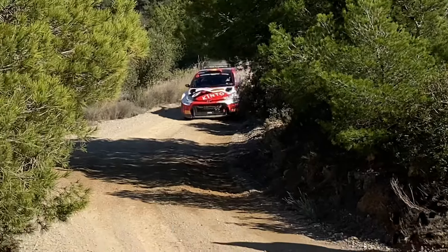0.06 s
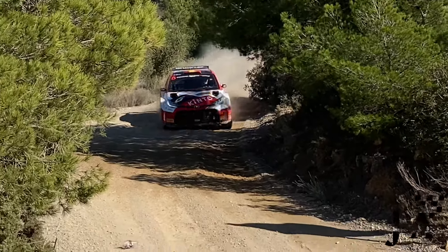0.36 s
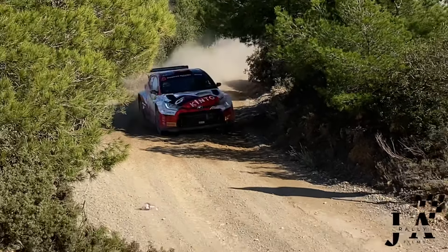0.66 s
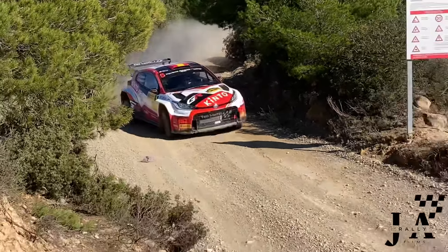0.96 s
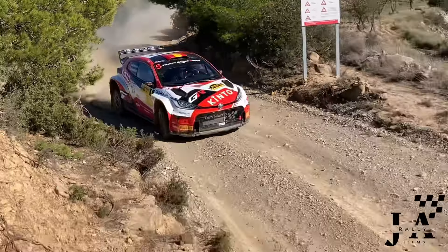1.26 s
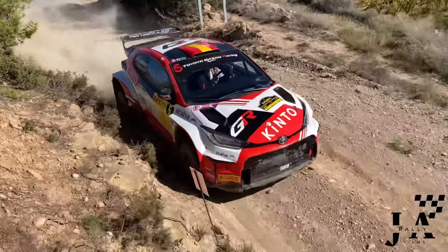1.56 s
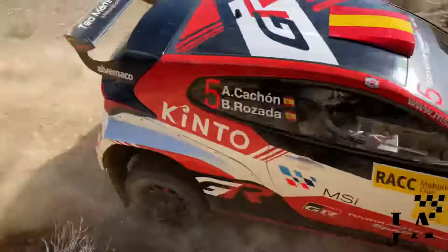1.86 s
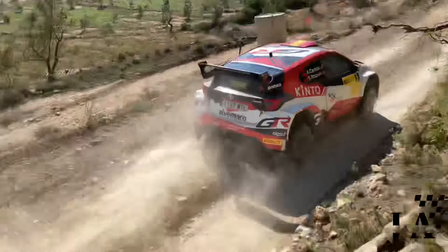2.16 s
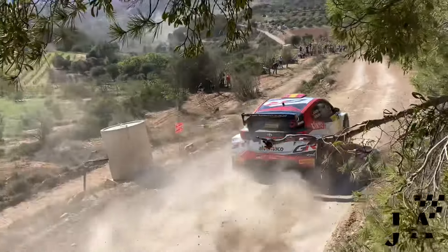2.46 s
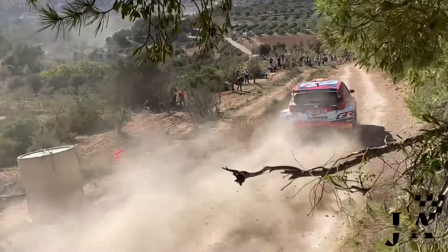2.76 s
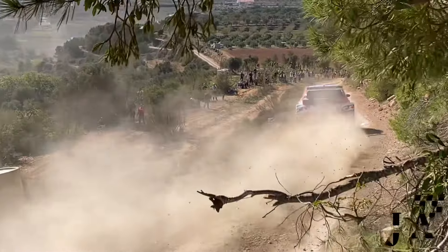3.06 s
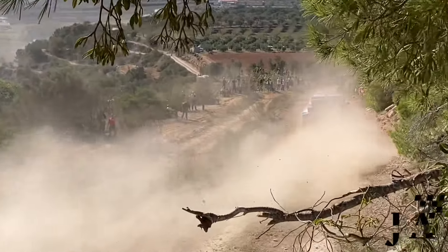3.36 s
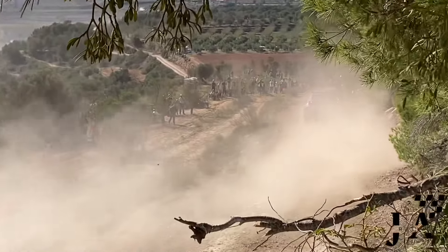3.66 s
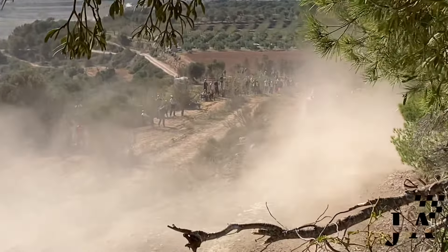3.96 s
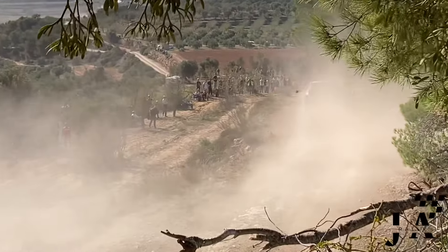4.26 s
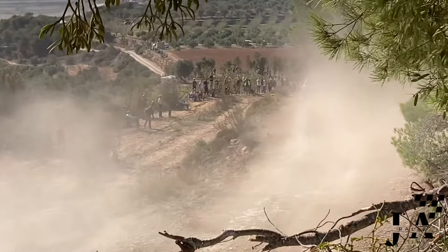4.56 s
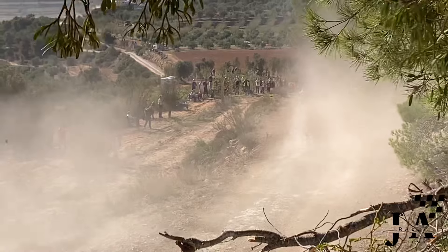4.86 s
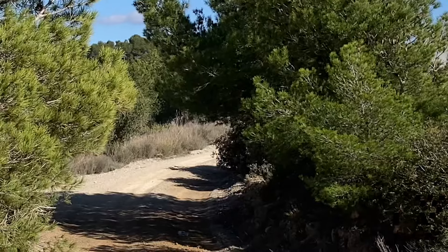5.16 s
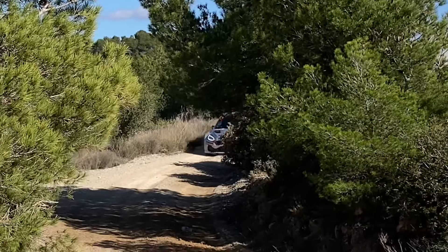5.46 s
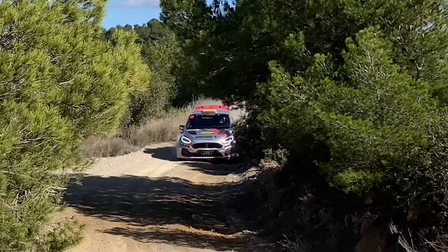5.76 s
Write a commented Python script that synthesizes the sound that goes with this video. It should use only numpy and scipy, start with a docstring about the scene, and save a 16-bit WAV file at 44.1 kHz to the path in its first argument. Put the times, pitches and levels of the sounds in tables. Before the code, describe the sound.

Heard from the verge of an outdoor gravel track, a turbocharged rally car approaches hard, pops off the throttle, then accelerates past very close with a rasping snarl. Tyres roar, pebbles scatter and air thumps the microphone. As it draws away, the engine note breaks into quick runs of bangs. The sound cuts with a click to another car coasting nearer, burbling and thudding over the ruts.

```python
"""A three-cylinder turbo rally car on a gravel road, from a stereo microphone on the verge, 4.5 m off.
It storms up, lifts, passes and pulls away, each firing ringing the exhaust, which pops off the throttle
and breaks into single bangs when the ignition is cut. The turbo whistles, tyres spray stones and air
buffets the microphone; distance, jolts and throttle set the road noise, and the banks answer dully.
Then a splice clicks as the sound cuts abruptly to a second car coming up, burbling off the throttle."""
import sys
import numpy as np
from scipy import signal
from scipy.fft import rfft, irfft, next_fast_len
from scipy.io import wavfile
from scipy.ndimage import uniform_filter1d, map_coordinates

SR = 44100
rng = np.random.default_rng(int(sys.argv[2]) if len(sys.argv) > 2 else 0)


def transcribe(signal):
    """Save signal, clipped to [-1, 1], as a 16-bit WAV file at the path in sys.argv[1]."""
    frames = np.atleast_2d(signal).T
    limited = np.clip(frames, -1, 1)
    pcm = np.round(limited * 32767).astype(np.int16)
    wavfile.write(sys.argv[1], SR, pcm)


N = 256220
T = np.arange(N) / SR
PASS_S, CLOSEST_M, SPEED_M_PER_S = 1.702, 4.47, 20.6  # the first car's path past the microphone
SECOND_CAR_S = 5.029

# engine speed, one table a pull: time_s, firing_hz
REVS = [
    [(.12, 142.3), (.23, 128.4), (.286, 137.9), (.346, 132), (.454, 140.5), (.49, 134.7), (.6, 142.5),
     (.71, 138), (.76, 144.3), (.83, 141.7), (.87, 132.9), (.93, 130.7), (1.02, 136)],
    [(1.27, 136), (1.446, 125.5), (1.526, 133), (1.572, 128.6), (1.682, 133.6), (1.76, 127.5),
     (1.964, 131.8), (1.994, 125.6), (2.044, 138.4), (2.09, 130.8), (2.118, 137.8), (2.156, 132),
     (2.33, 130.6), (2.78, 140.4), (3.03, 134.7), (3.08, 112.1), (3.3, 119.3), (3.6, 106.9)],
    [(4.09, 116.4), (4.18, 104.9), (4.48, 111.2)],
    [(5.02, 110.3)],
    [(5.03, 143.3), (5.11, 153)],
]
# the revs flare as the wheels go light over a crest: time_s, extra_hz, half_length_s
FLARES = [(2.855, 16.4, 0.077), (3.127, 25, 0.017), (3.218, 25, 0.043)]
# exhaust at the verge, one table a pull: time_s, firing_note_db, octave_db, bark_db, rasp_db
PULLS = [
    [(0, -32, -54, -29.5, -51), (.38, -16, -37, -13, -23.5), (.65, -19.5, -38, -19, -30),
     (.82, -16, -41, -17, -21.5), (.905, -26, -25, -22.5, -26), (.945, -20, -21, -11.5, -18),
     (.985, -26, -23.5, -14.5, -24), (1.02, -22, -30, -35, -27)],
    [(1.27, -27, -27, -21.5, -37), (1.51, -19, -16, -13.5, -34), (1.61, -16, -16.5, -14, -20.5),
     (1.69, -14.5, -21.5, -18, -19), (1.79, -18.5, -16.5, -29.5, -28), (1.86, -16.5, -19, -10, -24),
     (1.92, -19.5, -28, -11.5, -24), (1.99, -24, -43, -10.5, -26.5), (2.12, -23, -25.5, -23, -25.5),
     (2.6, -25.5, -21.5, -28, -35), (3.03, -25.5, -27, -22, -36), (3.07, -27, -27, -28.5, -39.5),
     (3.4, -34.5, -32.5, -25.5, -43.5), (3.6, -37, -36, -32, -44.5)],
    [(4.09, -37.5, -32.5, -27.5, -39), (4.3, -40.5, -33, -27, -43), (4.48, -42, -33.5, -31.5, -43)],
    [(4.97, -42, -35, -30, -34.5), (5.02, -57, -32, -28, -38)],
    [(5.03, -18.5, -36, -26, -33), (5.11, -19.5, -53, -27.5, -35)],
]
# the bands of those four levels: low_hz, high_hz
REGISTERS = [(70, 195), (195, 325), (325, 740), (740, 7000)]
# crankshaft drone: time_s, level_db
CRANK = [(.3, -23.5), (.82, -15.5), (1.02, -58)]
# exhaust from ahead of the car and from behind: frequency_hz, gain_db
FRONT_COLOUR = [(135, 11), (260, 1), (400, 11.5), (540, -2.5), (690, -10), (850, 4.5), (1150, -1.5),
                (2200, -10), (3500, -15), (9000, -39.5)]
REAR_COLOUR = [(25, -82), (110, 13.5), (240, 11), (500, 21.5), (680, 10.5), (830, 0.5), (1400, -11.5),
               (2300, -19.5), (2900, -50), (3800, -22.5), (8000, -47), (12000, -32), (16000, -88)]
# gas spat as the tailpipe swings past the microphone: frequency_hz, gain_db
SPIT_COLOUR = [(700, -11), (1300, 2), (2200, 2.5), (4200, 3), (6500, -10), (16000, -38)]
# exhaust resonances shifting as the car sweeps by, one table each: time_s, pitch_hz, level_db
HONK = [(1.58, 600, -26), (1.69, 600, -16.5), (1.8, 553, -46), (2, 546, -25), (2.13, 753, -24),
        (2.23, 685, -22.5), (2.42, 550, -52)]
SNARLS = [
    [(.33, 890, -40), (.58, 1000, -25.5), (.85, 850, -30.5)],
    [(1.5, 1192, -28), (1.86, 1210, -32), (1.93, 1430, -38), (2, 1287, -24), (2.15, 1176, -37)],
    [(2.06, 2200, -25), (2.2, 1520, -35), (2.37, 1270, -22)],
    [(2.91, 820, -27.5), (3.07, 795, -43)],
]
# rough ground shakes the car: time_s, half_length_s, strength (0-1)
JOLTS = [(0.16, 0.051, 0.33), (0.281, 0.15, 0.96), (0.895, 0.075, 0.89), (1.32, 0.16, 0.44),
         (1.791, 0.086, 1)]
# turbo chirps: time_s, pitch_hz, level_db, half_length_s, pitch_scatter (share)
CHIRPS = [(0.501, 2807, -15, 0.011, 0.027), (1.023, 2843, -0.5, 0.0058, 0.0028),
          (1.407, 3085, -6, 0.012, 0.058)]
# the first car's road noises, by name:
# closest_db, coming_loss_db and going_loss_db (per doubling of distance), jolt_gain_db, lift_loss_db
ROAD = {"buffet": (-28.5, 2, 18, 12.5, 2.5), "roar": (-21, 3, 8, 1, 8), "spray": (-33, 3, 9.5, 2.5, 8.5),
        "shell": (-33.5, -3, 4, 7.5, -1.5), "hollow": (-30.5, 0, 16, 9.5, -3.5)}
# tyre roar, flying grit and air on the microphone: frequency_hz, gain_db
ROAR_COLOUR = [(60, -34), (250, 7), (1300, 5.5), (5000, -7.5), (16000, -81)]
SPRAY_COLOUR = [(1500, -13.5), (7500, 7), (11000, 6), (16000, -5.5)]
BUFFET_COLOUR = [(20, -34), (50, -3), (70, 3), (200, -44), (2000, -89)]
# wheelspin flings a sheet of grit: start_s, end_s, extra_db
WHEELSPIN = [(0.82, 1.034, 3.5), (1.916, 2.163, 6.5), (2.92, 3.067, 10.5), (5.044, 5.103, 4.5)]
# a car bottoms in ruts: start_s, level_db
THUDS = [(1.011, -16.5), (2.026, -17), (2.084, -15), (2.294, -21.5), (5.269, -14.5), (5.454, -9)]
# stones strike the underbody: start_s, relative_db, pitch_hz
STONES = [(0.1405, -9, 1300), (0.258, -12, 1600), (0.318, -12, 1580), (0.898, -15, 1950),
          (0.9994, -11.5, 1950), (1.768, -13, 2100)]
# a stone's crack: frequency_hz, gain_db
STONE_COLOUR = [(300, -11), (1200, 20.5), (3800, 8.5), (6000, -4), (12000, 2), (16000, -53)]
# off-throttle pops: start_s, level_db
POPS = [(1.054, -25.5), (1.077, -24), (1.136, -19.5), (1.159, -26), (1.183, -18), (1.279, -38),
        (1.302, -21)]
# a pop in the manifold: frequency_hz, gain_db
POP_COLOUR = [(150, -15), (400, 21), (650, -15), (1000, 0.5), (2000, 8.5), (3500, -20), (16000, -56)]
# pebbles land near the microphone: start_s, level_db
PEBBLES = [(1.942, -17), (1.949, -17.5), (1.964, -18), (2.078, -19.5), (2.086, -18), (2.22, -30),
           (2.288, -25.5)]
# lone firings down the road: start_s, level_db, relative_crack_db
BANGS = [(3.652, -15.5, -26), (3.683, -13, -23), (3.703, -18, -21.5), (3.734, -12, -31),
         (3.755, -15, -19.5), (3.784, -14, -24), (3.815, -14, -25), (3.847, -13.5, -24),
         (3.868, -13, -20.5), (3.899, -13.5, -25), (3.919, -15.5, -19), (3.951, -13, -29),
         (3.98, -13, -28.5), (4.011, -12, -26), (4.031, -16, -27), (4.063, -13, -30), (4.092, -11.5, -27),
         (4.433, -11.5, -25), (4.499, -12, -25.5), (4.529, -12, -29), (4.549, -12, -22), (4.579, -13, -25),
         (4.599, -12.5, -20), (4.628, -12, -26), (4.658, -11.5, -26), (4.688, -12, -28.5),
         (4.739, -14.5, -31), (4.758, -13.5, -20), (4.79, -14, -22), (4.822, -12, -28), (4.855, -14.5, -23),
         (4.877, -14, -22.5), (4.908, -13.5, -26), (4.928, -13, -22), (4.947, -15, -21.5),
         (4.974, -14, -24)]
# the second car's road noises: time_s, buffet_db, roar_db, spray_db, shell_db
SECOND_ROAD = [(5.03, -26.5, -37.5, -65, -34), (5.3, -19, -44.5, -67, -26), (5.5, -32, -34.5, -53.5, -24.5),
               (5.7, -20, -30.5, -36.5, -19), (5.8, -24, -29, -34, -20)]
# its coarser grit: frequency_hz, gain_db
GRIT_COLOUR = [(1500, -8), (4500, 6.5), (5800, -11), (7600, 2.5), (16000, -70)]
# its engine coasting: time_s, cycle_hz, third_harmonic_db, fourth_harmonic_db, pop_db
BURBLE = [(5.1, 44, -29, -27, -25.5), (5.26, 44.8, -20, -26.5, -22), (5.38, 40, -31, -20, -26.5),
          (5.5, 42.8, -20.5, -25.5, -20.5), (5.8, 43, -29, -19, -26)]
# its soft pops: frequency_hz, gain_db
BURBLE_COLOUR = [(150, -24), (380, -4), (550, 17.5), (750, -13), (1200, 3), (3000, -18.5), (16000, -73)]
# stereo width of the noises: frequency_hz, side_against_mid_db
WIDTH = [(100, -4), (400, -10.5), (1400, -16), (4000, 0.5), (8000, -20)]
# the microphone's balance: frequency_hz, left_minus_right_db
BALANCE = [(150, -2.5), (400, 0), (1500, 2.5), (4400, -0.5)]
# phase between its channels: frequency_hz, phase_rad
CHANNEL_PHASE = [(7400, 0), (9050, 3.14), (13700, 9.42), (15200, 12.5)]


def amp(db):
    """Decibels to gain."""
    return 10 ** (np.asarray(db) / 20)


def unit(x):
    """Scale to rms 1."""
    return x / np.sqrt(np.mean(x ** 2) + 1e-20)


def even(x):
    """Hold the running rms at 1."""
    power = uniform_filter1d(uniform_filter1d(x ** 2, size=1500), size=1500)
    return x / np.sqrt(np.abs(power) + 1e-12)


def along(points, hz):
    """Read (frequency_hz, value) points on a log frequency axis."""
    knots_hz, values = np.transpose(points)
    return np.interp(np.log(hz + 1), np.log(knots_hz + 1), values)


def curves(rows):
    """One value per sample for each column after the time."""
    times, *columns = np.transpose(rows)
    return [np.interp(T, times, column) for column in columns]


def wobble(rate):
    """A smooth random curve, rate knots a second."""
    return map_coordinates(rng.standard_normal(int(N * rate / SR) + 4), [T * rate])


def swell(time_s, half_s):
    """A bell-shaped rise and fall around a moment."""
    return np.exp(-((T - time_s) / half_s) ** 2)


def gate(start_s, end_s, ramp_samples):
    """1 between two moments, with ramped edges."""
    return uniform_filter1d(1. * ((T > start_s) & (T < end_s)), size=ramp_samples)


def filtered(x, response):
    """x times a response of frequency."""
    size = next_fast_len(N + 8192)
    return irfft(rfft(x, size) * response(np.fft.rfftfreq(size, 1 / SR)), size)[..., :N]


def ring(colour, sweep=0, size=4096):
    """Causal impulse response with this spectrum, peak 1; with sweep, the lows trail the highs."""
    hz = np.fft.rfftfreq(size, 1 / SR)
    cepstrum = irfft(np.log(amp(along(colour, hz))))
    cepstrum[1:size // 2] *= 2  # fold to minimum phase
    cepstrum[size // 2 + 1:] = 0
    response = irfft(np.exp(rfft(cepstrum) - 2j * np.pi * sweep * np.log(hz + 100)))
    return response / np.abs(response).max()


def through(x, response):
    """x convolved with a response."""
    return signal.fftconvolve(x, response)[:N]


def impulses(times, sizes):
    """Impulses shared between neighbouring samples."""
    at = np.clip(np.asarray(times) * SR, 0, N - 1)
    i = at.astype(int)
    return (np.bincount(i, sizes * (1 - at + i), N + 1) + np.bincount(i + 1, sizes * (at - i), N + 1))[:N]


def noise(colour):
    """Mono noise of rms 1."""
    return unit(filtered(rng.standard_normal(N), lambda hz: amp(along(colour, hz))))


def spread(colour):
    """Stereo noise whose width varies with frequency."""
    mid = noise(colour)
    side = filtered(noise(colour), lambda hz: amp(along(WIDTH, hz)))
    return np.array([mid + side, mid - side])


def decays(times, db, t60):
    """Envelope of blows that each fall 60 dB in t60 seconds."""
    return through(impulses(times, amp(db)), amp(-60 * T[:SR // 4] / t60))


def distance():
    """The first car's distance from the microphone, in multiples of the closest."""
    return np.hypot(1, SPEED_M_PER_S * (T - PASS_S) / CLOSEST_M)


def jolt():
    """How hard the car is shaken, 0 to about 1."""
    return sum(strength * swell(time_s, half_s) for time_s, half_s, strength in JOLTS)


def throttle(ramp_samples=200):
    """1 during a pull, 0 between pulls."""
    pulling = sum(1. * ((T >= pull[0][0]) & (T < pull[-1][0])) for pull in PULLS)
    return uniform_filter1d(pulling, size=ramp_samples)


def slack(spool_s=0.16):
    """Missing power, 0-1: lost as the throttle shuts, regained as the turbo spools up."""
    shut = 1 - throttle(ramp_samples=1000)
    memory = np.exp(-T[:SR] / spool_s)
    return np.maximum(shut, through(shut, memory / memory.sum()))


def road_db(name):
    """Level of one road noise: it follows distance, jolts and throttle until the second car takes over."""
    closest_db, coming_db, going_db, jolt_db, lift_db = ROAD[name]
    loss_db = np.where(T < PASS_S, coming_db, going_db) * np.log2(distance())
    first = closest_db - loss_db + jolt_db * jolt() - lift_db * slack()
    second = dict(zip(ROAD, curves(SECOND_ROAD) + [-63]))[name]  # its hollow ring stays faint
    return np.where(T < SECOND_CAR_S, first, second)


def resonance(x, glide, width_hz):
    """The part of x inside a moving resonance, at the level that the glide gives."""
    hz, db = curves(glide)
    carrier = np.exp(2j * np.pi * np.cumsum(hz) / SR)
    band = np.real(carrier * signal.lfilter(*signal.butter(2, width_hz / 2, fs=SR), x / carrier))
    return amp(db) * even(band) * gate(glide[0][0], glide[-1][0], ramp_samples=1500)


def engine(scatter_db=1.0, cylinder_db=-0.65, turn_s=2.1, spit_db=-23):
    """One exhaust pulse a firing; its colour changes as the tailpipe swings towards the microphone."""
    flare_hz = sum(extra_hz * swell(time_s, half_s) for time_s, extra_hz, half_s in FLARES)
    hz = curves(np.vstack(REVS))[0] + flare_hz
    firings = np.cumsum(hz * (1 + .005 * wobble(30))) / SR
    count = np.arange(1, int(firings[-1]))
    jitter, pulse_scatter, puff_scatter = rng.standard_normal((len(count), 3)).T
    times = np.interp(count, firings, T) + .00002 * jitter
    imbalance = np.cos(2 * np.pi * count / 3)  # the three cylinders fire unequally
    pulses = impulses(times, amp(cylinder_db * imbalance + scatter_db * pulse_scatter))
    puffs = unit(decays(times, 2 * puff_scatter, t60=0.039))  # turbulent gas from each firing
    behind = np.clip(.5 + (T - turn_s) / 0.32, 0, 1)
    front, rear = ring(FRONT_COLOUR, sweep=2.5), ring(REAR_COLOUR, sweep=0.726)
    pipe = lambda x: (1 - behind) * unit(through(x, front)) + behind * unit(through(x, rear))
    clean, turbulent = pipe(pulses), pipe(puffs * rng.standard_normal(N))
    # the turbulent share grows with jolts and, mostly in the rasp, far down the road
    rough = .01 + .75 * jolt() ** 2
    far = .5 * behind * (1 - 1 / distance()) ** 4
    shares = np.clip([rough + far / 20, rough + far], 0, 1)
    exhaust, rasp = np.sqrt(1 - shares) * clean + np.sqrt(shares) * turbulent
    spit = unit(through(pulses, ring(SPIT_COLOUR)) * (1 + 0.076 * rng.standard_normal(N)))
    out = amp(spit_db) * swell(time_s=1.985, half_s=0.27) * spit
    out += resonance(exhaust, HONK, width_hz=150)
    out += sum(resonance(rasp, glide, width_hz=330) for glide in SNARLS)
    sources = [exhaust, exhaust, exhaust, rasp]
    for (low_hz, high_hz), db, source in zip(REGISTERS, curves(np.vstack(PULLS)), sources):
        band = lambda f: 1 / (1 + (f / high_hz) ** 12) - 1 / (1 + (f / low_hz) ** 12)
        out += amp(db) * even(filtered(source, band))
    crank = np.sin(2 * np.pi * firings * 2 / 3)  # three firings take two turns of the crankshaft
    return throttle() * (out + amp(curves(CRANK)[0]) * crank)


def turbo(whistle_db=-38, whistle_hz=2835, overtone_db=-22):
    """The turbo sings thinly under boost on the approach and chirps when pressure is let off."""
    envelope = amp(whistle_db + 1.6 * wobble(18)) * np.interp(T, [0, .78, .9], [1, 1, 0])
    out = envelope * np.sin(2 * np.pi * np.cumsum(whistle_hz * (1 + 0.0213 * wobble(200))) / SR)
    for time_s, hz, db, half_s, scatter in CHIRPS:
        phase = 2 * np.pi * np.cumsum(hz * (1 + scatter * wobble(900))) / SR
        envelope = amp(db) * np.exp(-np.abs((T - time_s) / half_s) ** 3)
        out += envelope * (np.sin(phase) + amp(overtone_db) * np.sin(2 * phase))
    return out


def gravel(roar_trim_db=0.5, spray_trim_db=3.0, grain_db=2):
    """Tyres roar on the loose surface and fling grit in clumps, more of it under wheelspin."""
    spin_db = sum(db * gate(start_s, end_s, ramp_samples=700) for start_s, end_s, db in WHEELSPIN)
    clumps = lambda: unit(amp(grain_db * wobble(700) + 2.42 * wobble(40)))
    roar = amp(road_db("roar") + roar_trim_db + spin_db / 2) * clumps() * spread(ROAR_COLOUR)
    spray = amp(road_db("spray") + spray_trim_db + spin_db) * clumps() * spread(SPRAY_COLOUR)
    return roar + spray


def rumble():
    """Air buffets the microphone; the car's shell rumbles and thuds, and its exhaust rings hollowly."""
    air = amp(road_db("buffet")) * even(noise(BUFFET_COLOUR))
    pipe = noise([(200, -31), (300, -13.0), (385, 23.5), (430, 11.5), (500, -49), (3000, -67)])
    shell = noise([(40, -13.5), (160, -3.5), (450, -14.5), (4000, -56.5)])
    times, db = np.transpose(THUDS)
    thuds = through(impulses(times, amp(db)), ring(BUFFET_COLOUR))
    return air + amp(road_db("shell")) * shell + amp(road_db("hollow")) * pipe + thuds


def hillside(x, t60=0.11, delay_samples=220):
    """Banks and trees scatter a short, dull, diffuse answer."""
    tails = (amp(-60 * T / t60) * spread(ROAR_COLOUR))[:, :SR // 2]
    return np.array([through(x, np.pad(h, (delay_samples, 0)) / np.linalg.norm(h)) for h in tails])


def stones(crack_db=-5, crack_t60=0.047, ring_db=-4, ring_t60=.06):
    """Each stone cracks against the car and rings the part that it hits."""
    times, db, _ = np.transpose(STONES)
    t = T[:SR // 4]
    rings = np.zeros(N + len(t))
    for start_s, stone_db, hz in STONES:
        phase = 2 * np.pi * np.cumsum(hz * (1 + .3 * rng.standard_normal(len(t)))) / SR
        rings[int(start_s * SR):][:len(t)] += amp(stone_db + ring_db - 60 * t / ring_t60) * np.sin(phase)
    return decays(times, db + crack_db, crack_t60) * spread(STONE_COLOUR) + rings[:N]


def pops():
    """Off the throttle, fuel pops in the hot manifold."""
    times, db = np.transpose(POPS)
    return decays(times, db, t60=0.067) * spread(POP_COLOUR)


def pebbles():
    """Flung pebbles land close to the microphone, each with a short bright click."""
    times, db = np.transpose(PEBBLES)
    return decays(times, db, t60=0.018) * spread(SPRAY_COLOUR)


def bangs(crack_trim_db=5, crack_lag_s=0.001017):
    """With most sparks cut, lone firings slam out of the tailpipe, each with a crack of burning gas."""
    times, db, crack_db = np.transpose(BANGS)
    slam = through(impulses(times, amp(db)), ring(REAR_COLOUR, sweep=0.558))
    crack = decays(times + crack_lag_s, db + crack_db + crack_trim_db, t60=0.052)
    return slam + crack * noise([(200, -24), (750, 16.5), (1700, 2), (4500, -11.5), (16000, -30)])


def splice(click_db=-12):
    """A splice clicks as the sound cuts abruptly to the second car."""
    return impulses([SECOND_CAR_S], amp(click_db))


def second_grit(grit_db=-8, grain_db=2):
    """The second car's tyres throw coarser grit, a gravelly rush that grows with their roar."""
    level_db = road_db("roar") + grit_db + grain_db * wobble(700)
    return (T >= SECOND_CAR_S) * amp(level_db) * spread(GRIT_COLOUR)


def burble(scatter_db=1.0, waver_db=4):
    """The second car coasts on one firing a cycle: a drone on low harmonics, and a soft pop each time."""
    hz, third_db, fourth_db, pop_db = curves(BURBLE)
    cycles = np.cumsum(hz * (T >= BURBLE[0][0])) / SR
    drone = sum(amp(db + waver_db * wobble(25)) * np.sin(2 * np.pi * harmonic * cycles)
                for harmonic, db in [(2, third_db - 3), (3, third_db), (4, fourth_db)])
    times = np.interp(np.arange(1, int(cycles[-1]) + 1), cycles, T)
    puffs = decays(times, scatter_db * rng.standard_normal(len(times)), t60=0.066)
    return drone + amp(pop_db) * puffs * spread(BURBLE_COLOUR)


def scene(echo_db=-20, left_lead_s=0.00013):
    """Cars, tyres and air, heard from the verge between the banks of the road."""
    car = engine() + bangs() + turbo()
    shift_s = left_lead_s * swell(PASS_S, half_s=0.83) / 2  # passing, it reaches the left side first
    direct = np.array([np.interp(T + shift_s, T, car), np.interp(T - shift_s, T, car)])
    return (direct + amp(echo_db) * hillside(car) + pops() + burble()
            + gravel() + stones() + pebbles() + rumble() + second_grit() + splice())


def record(dry, top_hz=16000):
    """The microphone's channels go in and out of phase up the treble; peaks round off, the top is cut."""
    sides = np.array([[1], [-1]]) / 2
    balance = lambda hz: amp(sides * along(BALANCE, hz))
    twist = lambda hz: np.exp(-1j * sides * along(CHANNEL_PHASE, hz))
    pair = filtered(dry, lambda hz: balance(hz) * twist(hz))
    rounded = pair / (1 + np.abs(pair) ** 8) ** (1 / 8)
    return filtered(rounded, lambda hz: hz < top_hz)


dry = scene()
out = record(dry)
transcribe(out)
```